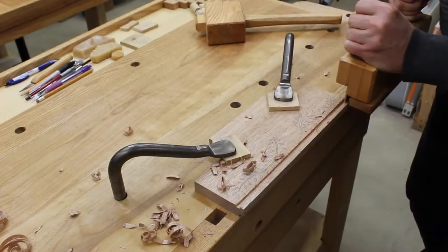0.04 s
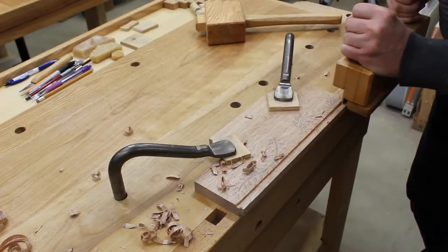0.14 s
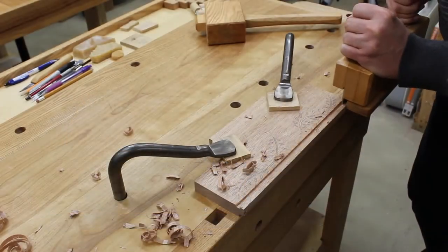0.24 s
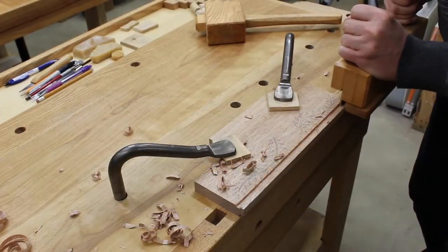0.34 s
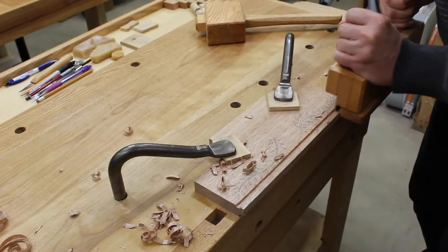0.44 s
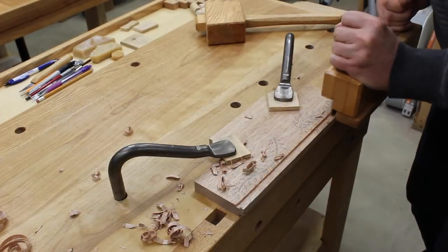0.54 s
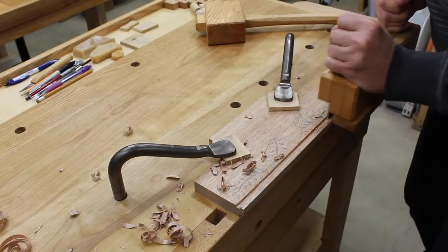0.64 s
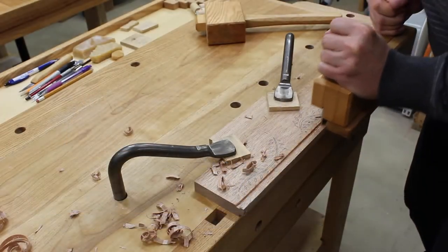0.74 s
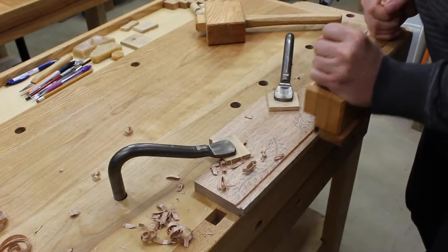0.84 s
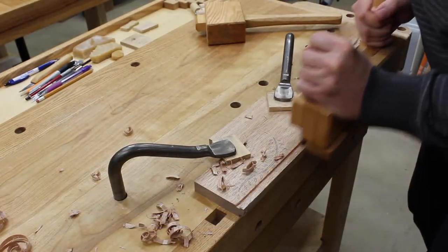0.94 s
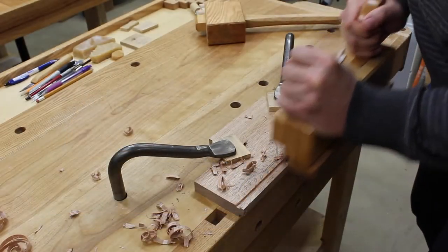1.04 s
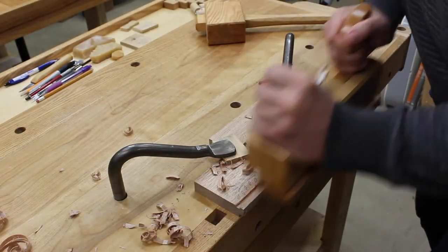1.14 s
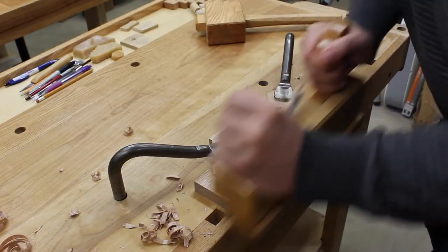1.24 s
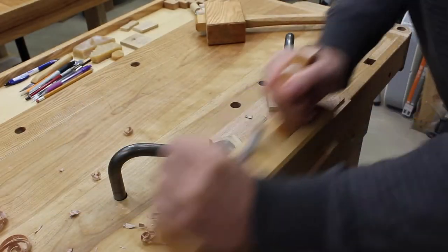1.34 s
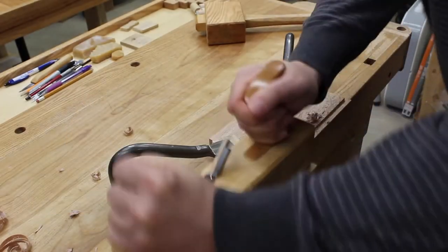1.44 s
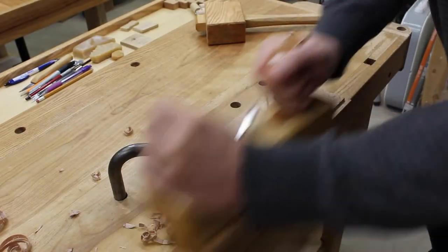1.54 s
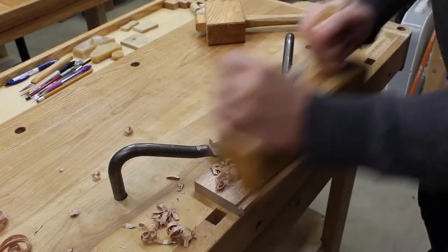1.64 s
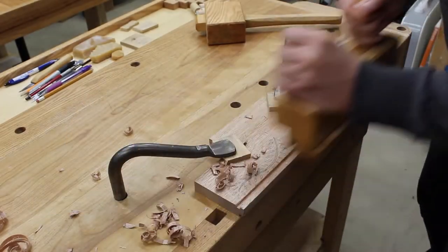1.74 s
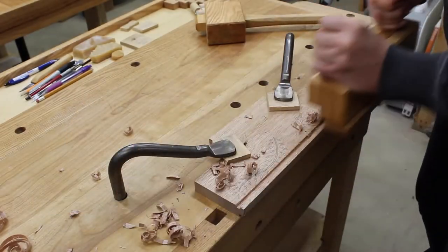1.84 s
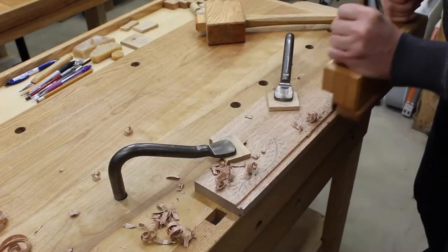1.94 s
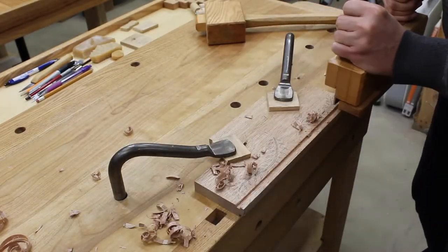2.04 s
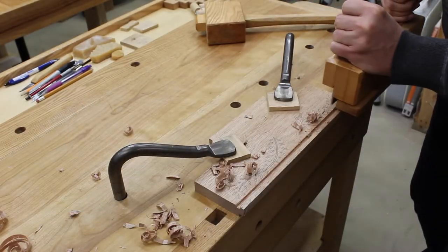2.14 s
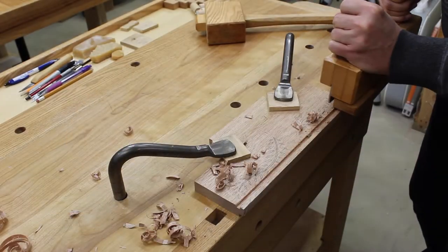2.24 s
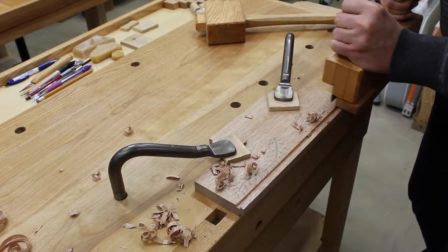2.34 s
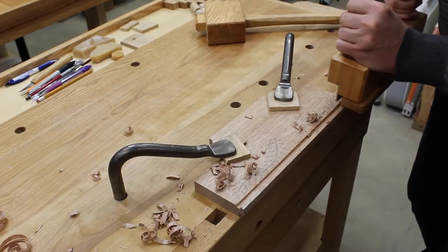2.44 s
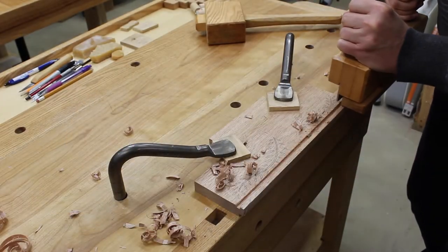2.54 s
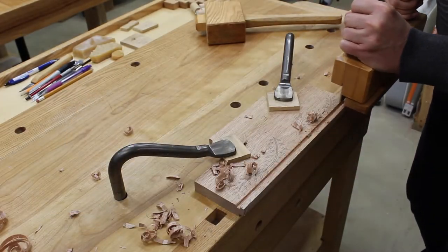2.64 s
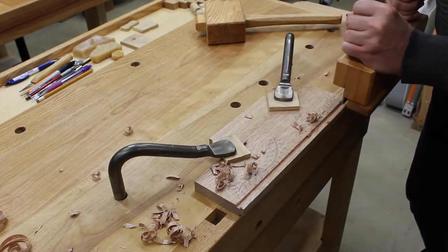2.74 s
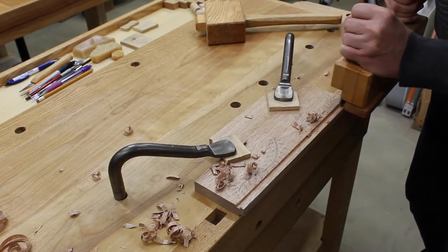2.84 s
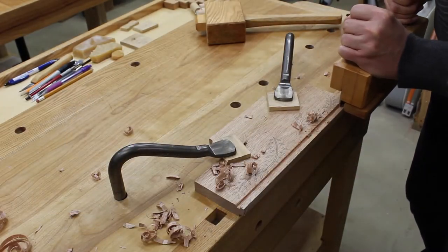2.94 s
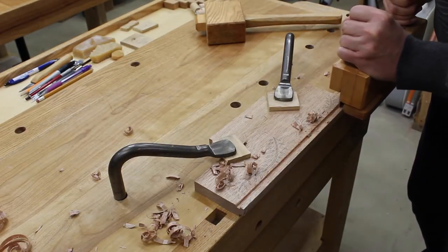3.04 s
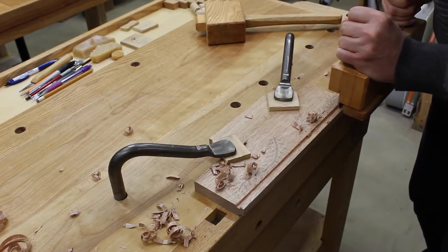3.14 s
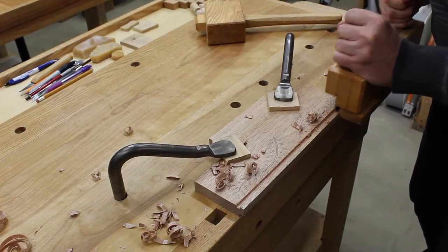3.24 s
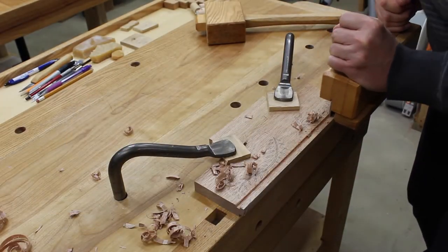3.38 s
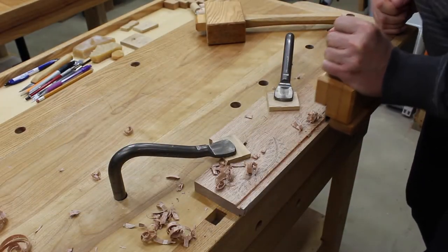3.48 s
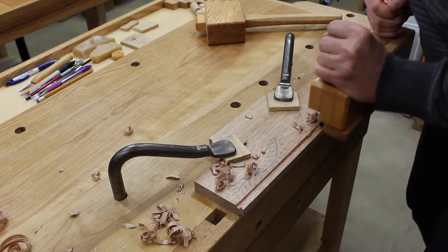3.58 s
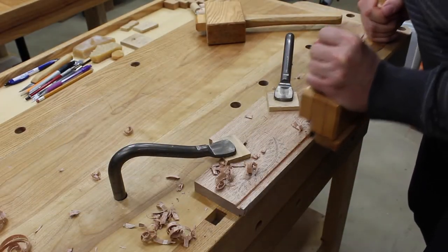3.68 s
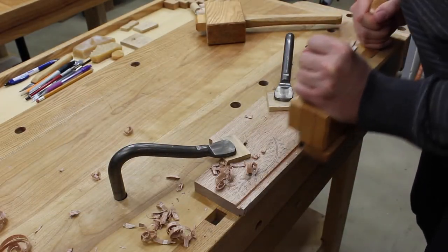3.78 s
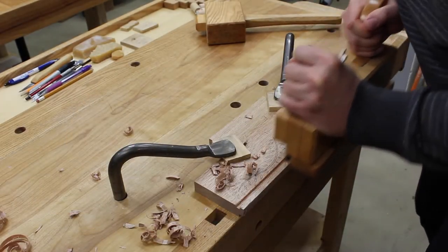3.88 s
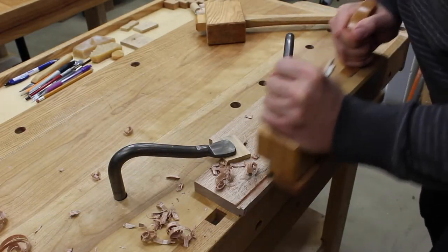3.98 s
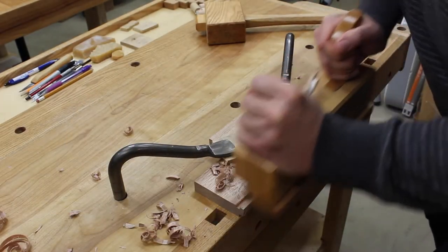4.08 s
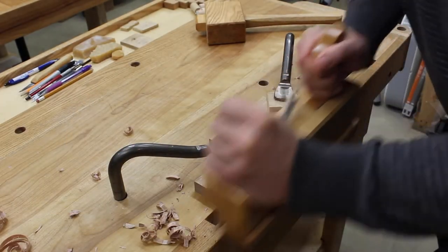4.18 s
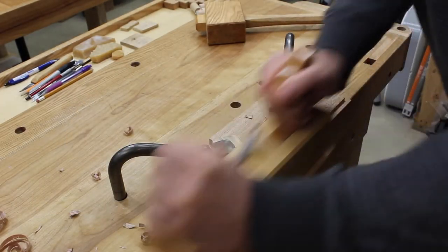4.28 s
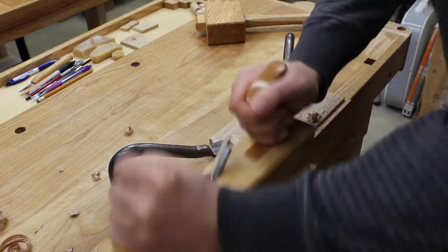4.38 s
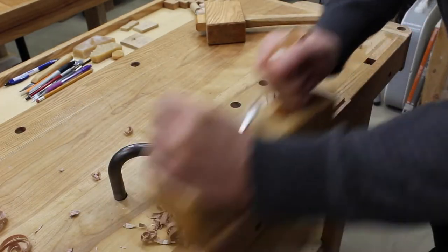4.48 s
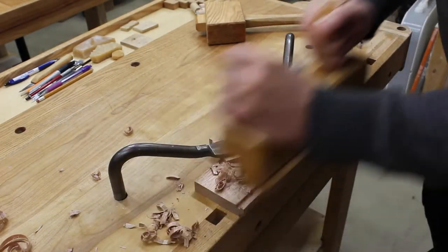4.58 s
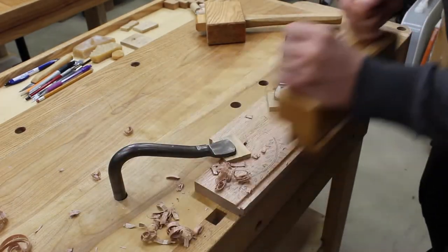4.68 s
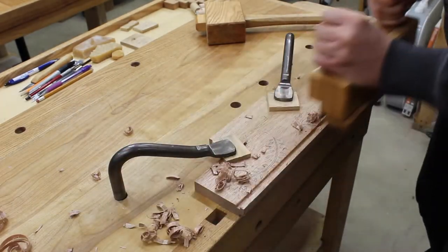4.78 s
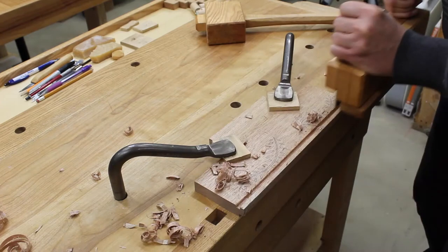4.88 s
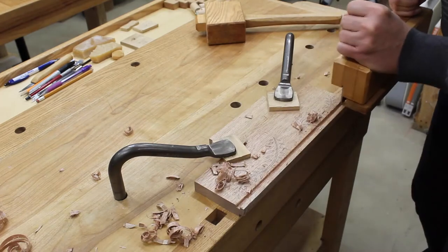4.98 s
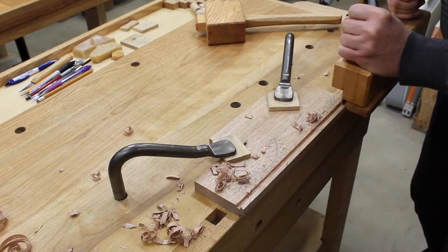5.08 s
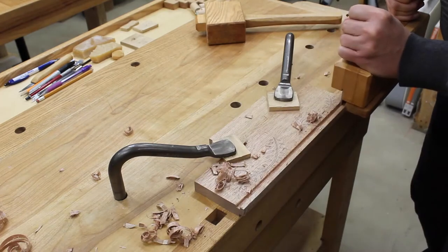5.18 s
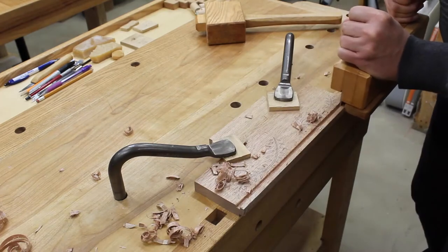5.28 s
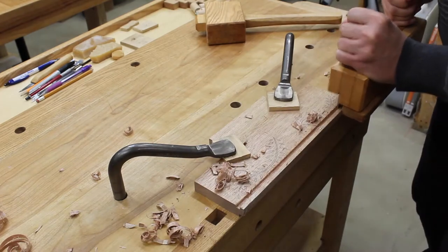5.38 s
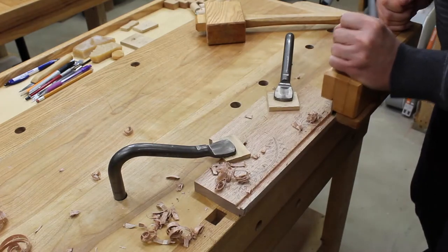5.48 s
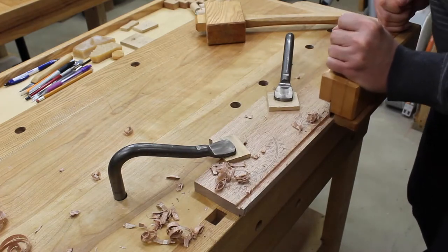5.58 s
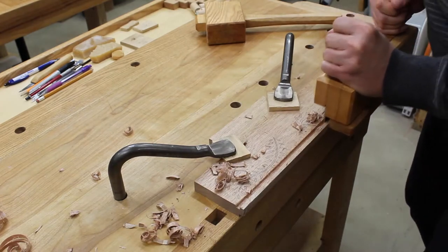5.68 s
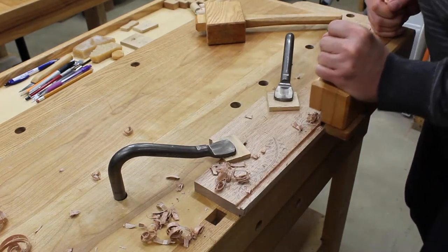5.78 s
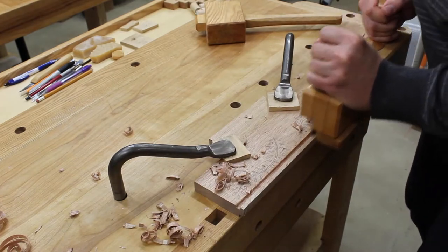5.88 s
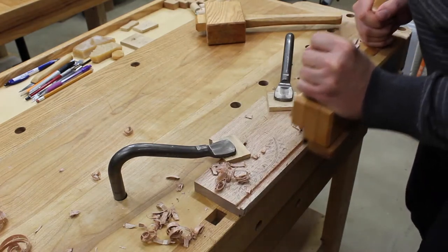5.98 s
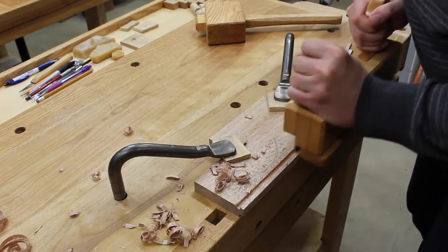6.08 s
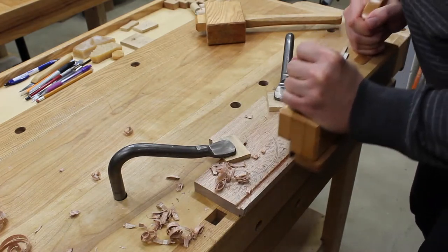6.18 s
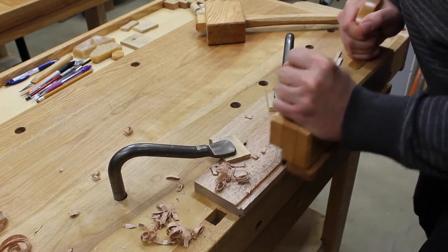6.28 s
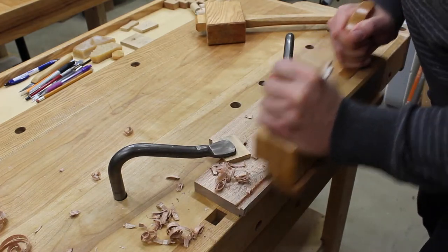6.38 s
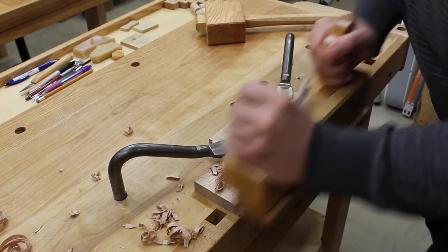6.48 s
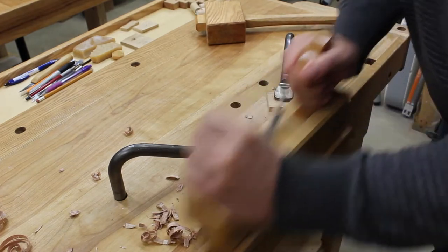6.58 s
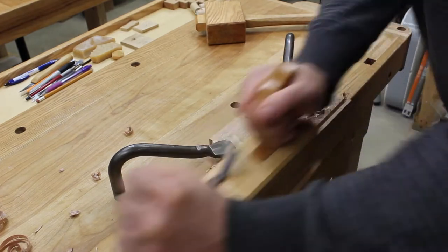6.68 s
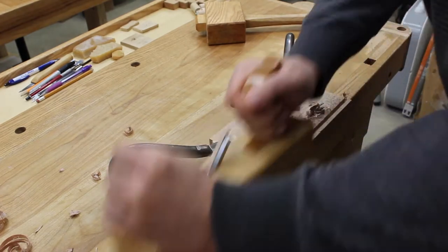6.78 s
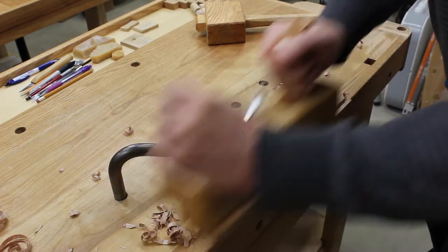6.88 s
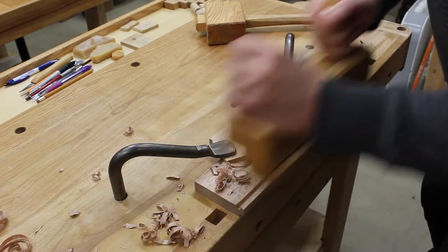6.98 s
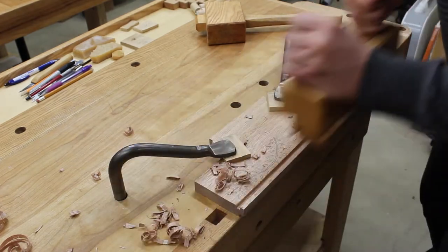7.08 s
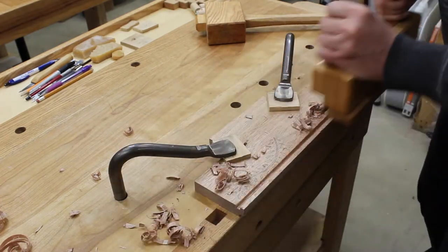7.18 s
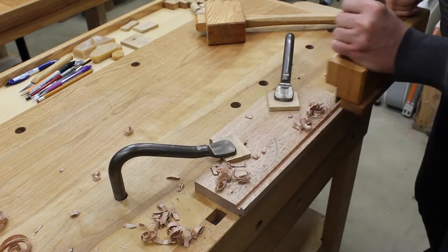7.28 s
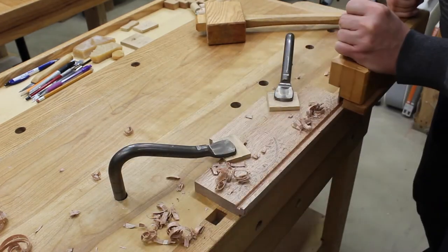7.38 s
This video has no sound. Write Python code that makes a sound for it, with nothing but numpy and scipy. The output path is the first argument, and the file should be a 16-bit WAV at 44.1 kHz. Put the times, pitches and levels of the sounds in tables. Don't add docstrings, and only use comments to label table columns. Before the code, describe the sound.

Close crunchy wood planing on a bench: three swelling strokes, hollow knocks as the tool is reseated, dry crackling shavings, short room echo.

```python
import sys
import numpy as np
from scipy import signal
from scipy.fft import rfft, irfft, next_fast_len
from scipy.io import wavfile
from scipy.ndimage import uniform_filter1d, map_coordinates

SR = 44100
rng = np.random.default_rng(int(sys.argv[2]) if len(sys.argv) > 2 else 0)


def volts_from_db(level):
    exponent = np.asarray(level, float) / 20
    return 10 ** exponent


def transcribe(u):
    v = np.clip(np.atleast_2d(u).T, -1, 1)
    q = np.round(v * 32767).astype(np.int16)
    wavfile.write(sys.argv[1], SR, q)


N = 327222

# (frequency [Hz], level [dB per Hz])
AIR_COLOUR = [(12, -52), (20, -34), (64, 0), (106, -8), (141, 0.5), (290, -13), (429, -9.5), (616, -12.5),
              (1050, -6.5), (1170, -9), (1380, -10.5), (1630, -12), (11500, -29.5), (15600, -48)]
# (frequency [Hz], level [dB rms])
HUM_LINES = [(58, -76), (11219, -86), (11816, -84)]
# (frequency [Hz], time to fall 60 dB [s])
SHOP_T60 = [(150, 0.17), (600, 0.23), (1200, 0.32), (4000, 0.32), (12000, 0.06)]

# (time [s], peak level [dB], frequency [Hz], rise [s], time to fall 60 dB [s])
BODY_BUMPS = [(3.5, -32, 94, 0.0066, 0.15), (2.2, -56, 72, 0.006, 0.14), (0.66, -41, 145, 0.006, 0.12),
              (1.335, -18, 562, 0.0085, 0.1), (3.71, -23, 562, 0.0097, 0.078),
              (6.138, -21, 296, 0.0032, 0.038), (1.3, -33, 254, 0.006, 0.079),
              (0.00048, -31.5, 310, 0.0067, 0.061), (0.47, -52, 291, 0.011, 0.097),
              (1.513, -50, 790, 0.011, 0.15), (2.015, -31, 301, 0.0083, 0.039),
              (2.6, -55, 460, 0.011, 0.091), (4.452, -53, 294, 0.011, 0.11),
              (5.087, -28.5, 292, 0.013, 0.076), (6.758, -17.5, 295, 0.0051, 0.052),
              (6.795, -34, 760, 0.0088, 0.053)]

# (time [s], effort [dB], downward pressure [dB])
PUSH_PATHS = [
    [(0.6, -47, -6), (0.64, -45.5, -8), (0.72, -38, 0.5), (0.892, -36, 1.5), (1.02, -30.5, 2.5),
     (1.206, -28, -3), (1.33, -26, -1), (1.406, -45.5, -5), (1.495, -48.5, -8)],
    [(3.42, -51, -21), (3.454, -47, -3), (3.488, -36, 0.5), (3.626, -40, 1), (3.68, -34.5, 0.8),
     (4.126, -30.5, 1.5), (4.242, -27, -2.5), (4.318, -44, -1.5), (4.45, -46, -18)],
    [(5.602, -49, -22), (5.672, -38.5, 0), (5.818, -42, 4), (5.912, -33, 1), (5.96, -38, 5),
     (6.022, -32, 0.2), (6.164, -43, 3), (6.196, -42, 0), (6.3, -34.5, 6)],
    [(6.345, -37.5, 0), (6.438, -28, -0.7), (6.616, -25, 0.5), (6.644, -39.5, 13.5), (6.73, -45, -20),
     (6.85, -57, 2)],
]
# (loudest time [s], rise [s], fall [s], level [dB],
# weight [dB])
SLIDE_MOVES = [(0.002, 0.02, 0.086, -64, 25), (0.118, 0.049, 0.12, -45, -12), (0.4, 0.066, 0.28, -56, -16),
               (0.541, 0.25, 0.16, -46, -10.5), (1.55, 0.18, 0.14, -50.5, -8), (1.68, 0.13, 0.2, -55.5, -4),
               (2.07, 0.09, 0.13, -47.5, -7.5), (2.18, 0.052, 0.11, -49.5, -9),
               (2.27, 0.1, 0.089, -47, -13.5), (2.43, 0.086, 0.11, -45, -7), (2.97, 0.1, 0.075, -49.5, 2),
               (3.1, 0.038, 0.025, -41.5, 0.5), (3.31, 0.13, 0.05, -49.5, -12),
               (3.36, 0.067, 0.044, -39, -14), (4.75, 0.24, 0.14, -64, -7), (5.015, 0.027, 0.12, -48, -1),
               (5.09, 0.038, 0.077, -45.5, -3), (5.264, 0.09, 0.044, -50.5, -2),
               (5.49, 0.18, 0.091, -47, -11), (5.56, 0.11, 0.023, -37.5, -6), (6.8, 0.05, 0.03, -48, 10),
               (7.0, 0.22, 0.077, -57, -4)]
# (offset [dB], growth with effort [dB/dB], share of pressure [dB/dB])
PUSH_MIX = [
    (-0.93, 1.31, 0.95),
    (-2, 1.02, 0.18),
    (-0.02, 1.01, 0.0097),
    (-6.5, 0.7, 0.011),
]
# (offset [dB], share of weight [dB/dB])
SLIDE_MIX = [
    (-14, 1.32),
    (-1.5, 0.74),
    (-0.94, -0.14),
    (-18, -0.87),
]
REST_LEVELS = [-59, -66.5, -61, -72]
# (time [s], surge, negative when easing [dB],
# dies in [s])
GRAIN_CATCHES = [(.7, 1, .04), (.804, 0.5, 0.045), (.868, 1, 0.034), (.95, 0, 0.024), (.975, 1, 0.037),
                 (1.0, 1.5, .04), (1.15, 2.5, .03), (1.25, 2, 0.025), (1.285, 1.5, .03), (3.51, 2.5, .03),
                 (3.721, 3, .03), (3.82, 1.5, .03), (3.929, 1, 0.032), (4.05, 2.5, .03), (4.2, 1, .03),
                 (5.644, -0.5, 0.015), (5.666, 2.5, 0.041), (5.793, -0.5, .03), (5.841, 3.5, 0.017),
                 (5.867, 3, 0.015), (5.895, 2.5, 0.03), (5.97, 1.5, 0.018), (6.021, 1.5, 0.028),
                 (6.068, 4, 0.026), (6.198, 8, 0.013), (6.25, 1.5, 0.017), (6.267, -4, .02),
                 (6.345, 1.5, 0.02), (6.39, 1, 0.025), (6.448, 2, 0.044), (6.53, 1, .03),
                 (6.606, 2.5, 0.014)]
# (frequency [Hz], level [dB per Hz])
CUT_COLOUR = [(29, -62.5), (95, -31), (140, -5), (217, -5.5), (296, 0.5), (350, -5), (609, -9.5),
              (894, -12), (984, -11.5), (1110, -22), (2450, -10), (10100, -19), (15600, -38.5)]
# (frequency [Hz], width [Hz], level [dB])
CUT_MODES = [(305.5, 11, 10), (713, 20, 4.5), (908.6, 35, 7), (1127, 66, 3), (1350, 130, -4.5),
             (1540, 18, -4), (2440, 200, -14), (3370, 42, -15), (3410, 53, -8.5), (3760, 64, -9.5),
             (4900, 40, -21), (5800, 160, -16), (6300, 110, -24), (560.7, 11.4, 2)]
# (frequency [Hz], level [dB per Hz])
LIGHT_COLOUR = [(29, -57), (50, -6), (289, -2), (405, -10), (566, -3), (1280, -12.5), (2570, -14),
                (5830, -22), (10400, -19), (15600, -44)]
# (frequency [Hz], width [Hz], level [dB])
LIGHT_MODES = [(299, 26, 9), (945.5, 9.1, 7.5), (1990, 27, -19), (2610, 160, -8), (3470, 95, -8),
               (4040, 130, -8), (4550, 1600, -13.5), (5180, 98, -9), (5720, 480, -12.5), (6830, 54, -9),
               (560, 8, -10), (8600, 30, -31.5)]
# (frequency [Hz], level [dB per Hz])
SLIDE_COLOUR = [(59, -41), (100, -4), (670, 3.5), (777, 3), (980, -3.5), (2140, -9), (11500, -23.5),
                (13000, -44)]
# (frequency [Hz], width [Hz], level [dB])
SLIDE_MODES = [(796, 95, 2), (1240, 120, 8), (2070, 26, -1.5), (2760, 60, -5.5), (3250, 200, -8),
               (3860, 300, -11.5), (4840, 250, -9), (5430, 64, -28), (6800, 77, -26)]

# (time [s], level [dB], [(frequency [Hz], width [Hz], level [dB])])
KNOCK_SPOTS = [(0.125, -21, [(689, 110, 6), (934, 33, 2), (1244, 48, -4), (1530, 45, -9), (1980, 24, -8),
               (2370, 87, -13), (2750, 71, -12), (4110, 42, -20), (5400, 36, -15)]),
               (0.535, -49, [(275, 29, -9), (1200, 33, -10), (2530, 25, -8), (3390, 31, -6), (3880, 36, -8),
               (5130, 23, -13), (5790, 68, -12)]), (2.872, -22, [(668, 190, -2), (950, 18, -9),
               (1205, 24, 3), (1540, 28, -14), (2100, 32, -7), (2750, 35, -7), (2840, 31, -8),
               (3530, 41, -4), (4630, 29, -22), (5520, 100, -21)]), (3.325, -24, [(953, 29, -2),
               (1250, 35, -15), (1590, 48, -23), (1990, 18, -2), (2550, 59, -8), (3870, 28, -9),
               (5200, 91, -10), (5630, 31, -21)]), (5.503, -25, [(711, 39, -1), (910, 21, 10),
               (2080, 26, -2), (2540, 25, -4), (3240, 32, -24), (3870, 34, -10), (4470, 28, -12),
               (5110, 100, -11), (5600, 29, 3)]), (6.755, -28, [(899, 25, -7), (1323, 18, 0), (1520, 40, 8),
               (2230, 26, -6), (2520, 28, -12), (2970, 100, -16)]), (7.4033, -27, [(307, 120, -5),
               (646, 170, 3), (1260, 130, -3), (1800, 94, -15), (2520, 120, -18), (3210, 140, -18)])]
# (time [s], peak level [dB], thud [dB], crack [dB], decay stretch [ratio])
SEATINGS = [(0.126, -7.5, -23, -4, 1.24), (0.535, -21, -15.5, 11, 1.3), (1.515, -31.5, -8.5, 14.5, 1.07),
            (2.011, -28, -12, -3, 0.76), (2.872, -10.5, -24.5, -2, 1.05), (3.086, -26.5, -30, 3, 1.4),
            (3.107, -34.5, -4, -11, 0.52), (3.326, -15, -20, 5.5, 1.5), (4.45, -36.5, -5.5, 15, 0.84),
            (5, -45, -4, -3, 1.9), (5.098, -29.5, -23, 6, 0.66), (5.502, -12.5, -23, 10.5, 1.26),
            (6.135, -38, -2, -5, 0.74), (6.293, -27, -8, -15, 0.93), (6.755, -13.5, -14.5, -15, 0.91),
            (7.4024, -9, -22.5, -16, 0.76)]
# (frequency [Hz], level [dB], time to fall 60 dB [s])
WOOD_MODES = [(292, 3.5, 0.29), (397, -8.5, 0.56), (578.4, -10, 0.5), (730, 3.5, 0.12), (917, 2, 0.18),
              (1282, 1, 0.11), (1590, -2, 0.094), (1810, -3, 0.1), (2012, -7, 0.21), (2400, -43.5, 0.061),
              (2450, 1, 0.047), (2764, -35, 0.093), (3330, -66, .1), (3800, -2, 0.041), (5730, -0.5, 0.033)]
# (frequency [Hz], level [dB per Hz])
RATTLE_COLOUR = [(59, -51), (100, -12), (276, -9), (863, -7.5), (1210, -8), (1700, -18.5), (2760, -12.5),
                 (10000, -30.5), (15600, -52)]
# (frequency [Hz], time to fall 60 dB [s])
RATTLE_DECAY = [(150, 0.29), (700, 0.24), (1500, 0.19), (4000, 0.066), (12000, 0.16)]

# (time [s], peak level [dB], centre
# [Hz], width as share of centre [ratio])
SNAPS_AND_TICKS = [(0.8852, -20, 9090, 0.61), (1.326, -15, 6420, 1.5), (3.425, -32, 5780, 0.7),
                   (3.4825, -45, 6480, 0.7), (3.9265, -16.5, 5550, 0.51), (3.9633, -13.5, 5700, 0.88),
                   (4.249, -33, 6400, 0.61), (4.4374, -37, 5660, 0.49), (5.6445, -24.5, 3200, 0.88),
                   (5.665, -26, 9500, 0.7), (5.803, -26, 9460, 0.54), (5.868, -21.5, 6050, 0.44),
                   (5.901, -17, 4500, 0.83), (6.0034, -11, 9500, 1), (6.0256, -12, 4470, 1.4),
                   (6.071, -22, 5700, 0.7), (6.2002, -18, 7050, 2.4), (6.3404, -25, 9500, .6),
                   (6.397, -22, 5660, 1.6), (6.528, -22, 10000, 1.1), (6.5744, -30.5, 5800, 0.7),
                   (6.6107, -9.5, 5760, 0.84),
                   (1.6134, -49, 3240, 0.3), (2.618, -47, 5000, 0.3), (2.6214, -47, 2950, 0.11),
              (4.6793, -36, 3100, 1.2), (3.739, -19, 2200, 0.5), (5.002, -40, 3000, 1.1),
              (6.811, -44, 10500, 0.44), (6.085, -24, 11000, 0.4), (6.172, -32, 9000, 0.7),
              (6.209, -30, 4400, .6), (6.139, -26, 3400, 1.1), (5.895, -23, 9000, .8),
              (6.216, -35, 5500, .5), (2.872, -20, 4000, 0.71), (5.5035, -27, 5800, 1),
              (4.452, -34, 7000, 1), (0.1285, -18.5, 2000, 1.2)]
# (time [s], peak
# level [dB])
SHAVING_CRACKLES = [(0.8292, -33), (0.8846, -22), (0.9484, -27), (0.9953, -26), (1.0672, -17),
                    (1.1455, -26), (1.149, -27), (1.3047, -26), (1.3256, -20), (1.5022, -40), (1.5152, -38),
                    (2.8716, -36), (3.3255, -29), (3.4827, -34), (3.5096, -26), (3.5605, -40),
                    (3.6528, -29), (3.7291, -27), (3.7845, -30), (3.8199, -31), (3.8658, -33),
                    (3.8858, -25), (3.9092, -22), (3.9342, -26), (3.9636, -28), (3.9636, -18),
                    (4.0035, -20), (4.0225, -27), (4.0514, -24), (4.0723, -20.5), (4.0983, -27),
                    (4.1232, -22), (4.1507, -20), (4.227, -23), (4.4335, -41), (5.5011, -34), (5.5011, -27),
                    (5.6632, -26), (5.8024, -27), (5.8413, -34), (5.8678, -31), (5.8997, -27), (5.99, -31),
                    (6.003, -24), (6.0239, -23), (6.1995, -26), (6.2514, -31), (6.3197, -29), (6.3392, -28),
                    (6.3981, -19), (6.409, -18), (6.4265, -22), (6.4734, -20), (6.4909, -15), (6.5248, -13),
                    (6.6096, -16)]

# (start [s], end [s], rocking over bench layer [dB], its drift [dB/s],
# iron singing over tearing layer [dB])
WHOLE_STROKES = [
    (0.584, 1.334, -18, -21, -2),
    (3.5, 4.275, -13.5, 10, -0.5),
    (5.62, 6.626, -15, 6, -10),
]
# (at stroke start [Hz], at stroke end [Hz])
ROCKING_HZ = (68.6, 134.5)
# (start [s], end [s], start pitch [Hz], end pitch [Hz], level [dB])
SOLE_SQUEAKS = [(2.1, 2.07, 1800, 1800, -60), (2.17, 2.28, 2000, 2090, -52), (2.16, 2.22, 1600, 1750, -59),
                (2.4, 2.49, 1780, 1780, -61), (.6, 0.62, 2650, 2200, -56)]

# (frequency [Hz], level [dB])
MIC_LOSS = [(40, -18), (110, -5), (9000, -6.5), (12000, -9), (14500, -19), (16000, -30)]
# (frequency [Hz], level [dB])
TREBLE_FALL = [(20, -1.5), (14000, -2), (15050, -5), (15150, -22), (15750, -26)]
# (frequency [Hz], level [dB per Hz])
HISS_COLOUR = [(6000, -30), (11000, -29), (14000, 13), (15500, 4), (15570, -70)]

FULL_EFFORT_DB = -35


def unit(x):
    return x / np.sqrt(np.mean(x ** 2) + 1e-20)


def along(points, hz):
    f, v = np.transpose(points)
    return np.interp(np.log(hz + 1), np.log(f + 1), v)


def wobble(rate):
    knots = rng.standard_normal(int(N * 600 / SR))
    return map_coordinates(knots, [np.arange(N) * rate / SR])


def filtered(x, response):
    m = next_fast_len(len(x) + SR // 2)
    return irfft(rfft(x, m) * response(np.fft.rfftfreq(m, 1 / SR)), m)[:len(x)]


def dying(t60s):
    hz, t, z = signal.stft(rng.standard_normal(SR // 2), SR, nperseg=128)
    fade = volts_from_db(-60 * t / t60s(hz)[:, None])
    tail = signal.istft(z * fade, SR, nperseg=128)[1][:SR // 2]
    return tail / np.linalg.norm(tail)


def resonance(hz, centre_hz, width_hz):
    return 1j * hz * width_hz / (centre_hz ** 2 - hz * hz + 1j * hz * width_hz)


def moving_mode(s, hz, db, width_hz):
    t = np.arange(N) / SR
    turn = 2 * np.pi * np.cumsum(np.interp(t, s, hz)) / SR
    shake = wobble(width_hz) * np.cos(turn) + wobble(width_hz) * np.sin(turn)
    times, levels = [s[0] - 0.06, *s, s[-1] + 0.037], [-80, *db, -80]
    return shake * volts_from_db(np.interp(t, times, levels, -150, -150))


def room_tone():
    t = np.arange(N) / SR
    air = unit(filtered(rng.standard_normal(N), lambda hz: volts_from_db(along(AIR_COLOUR, hz))))
    lines = 0
    for hz, db in HUM_LINES:
        tone = np.sin(2 * np.pi * hz * t + 1.3 * wobble(9.4))
        lines = lines + np.sqrt(2) * volts_from_db(db + 1.9 * wobble(11)) * tone
    return volts_from_db(-53.5 + 0.62 * wobble(4.02)) * air + lines


def bumps():
    out, t = np.zeros(N + SR), np.arange(SR // 2) / SR
    for s, db, hz, rise, t60 in BODY_BUMPS:
        swell = (1 - np.exp(-t / rise)) ** 2 * volts_from_db(-60 * t / t60)
        out[round(s * SR):][:len(t)] += volts_from_db(db) * swell / swell.max() * np.sin(2 * np.pi * hz * t)
    return out[:N]


def motion():
    t = np.arange(N) / SR
    power = volts_from_db(2 * np.array(REST_LEVELS))[:, None] * np.ones(N)
    offset, growth, share = np.transpose(PUSH_MIX)[..., None]
    for s, effort, pressure in map(np.transpose, PUSH_PATHS):
        outside = np.maximum(np.maximum(s[0] - t, t - s[-1]), 0)
        fade = 247 * outside
        extra = np.interp(t, s, effort) - FULL_EFFORT_DB
        db = FULL_EFFORT_DB + offset + growth * extra + share * np.interp(t, s, pressure)
        power = np.maximum(power, volts_from_db(2 * (db - fade)))
    offset, share = np.transpose(SLIDE_MIX)[..., None]
    for s, rise, fall, db, weight in SLIDE_MOVES:
        away = np.abs(t - s) / np.where(t < s, rise, fall)
        shape = volts_from_db(-40 * away ** 1.87)
        power = power + volts_from_db(2 * (db + offset + share * weight)) * shape
    return 10 * np.log10(power)


def fibres(per_s, spread_db, rub):
    happens = rng.random(N) < per_s / SR
    size = np.minimum(rng.exponential(size=N), 5.5)
    sign = np.sign(rng.standard_normal(N))
    return unit(happens * sign * volts_from_db(spread_db * size)) + rub * rng.standard_normal(N)


def patchy(x, depth_db):
    hz, _, z = signal.stft(x, SR, nperseg=512)
    field = uniform_filter1d(rng.standard_normal(z.shape), size=4, axis=0)
    field = uniform_filter1d(field, size=9, axis=1)
    depth = depth_db * np.clip(hz / 1000, 0, 1)[:, None]
    return signal.istft(z * volts_from_db(depth * unit(field)), SR, nperseg=512)[1][:N]


def catches():
    t = np.arange(N) / SR
    surge = sum(db * (t >= s) * np.exp(-np.maximum(t - s, 0) / dies) for s, db, dies in GRAIN_CATCHES)
    return volts_from_db(surge)


def resonant(hz, colour, modes, lift_db):
    rings = sum(volts_from_db(db - along(colour, c) + lift_db) * resonance(hz, c, w) for c, w, db in modes)
    return volts_from_db(along(colour, hz)) * (1 + rings)


def band(hz, lo_hz, hi_hz):
    return np.sqrt(1 / (1 + (lo_hz / (hz + 1)) ** 8) / (1 + (hz / hi_hz) ** 8))


def plane(levels):
    force = fibres(per_s=5000, spread_db=2.5, rub=1.04) * volts_from_db(0.49 * wobble(14) + 0.49 * wobble(70))
    force = force + 0.2 * fibres(per_s=400, spread_db=2.0, rub=0)
    force = patchy(force * volts_from_db(1.3 * wobble(220)), depth_db=1.6)
    force = force * catches()
    heavy = filtered(force, lambda hz: resonant(hz, CUT_COLOUR, CUT_MODES, lift_db=-4.5))
    light = filtered(force, lambda hz: resonant(hz, LIGHT_COLOUR, LIGHT_MODES, lift_db=-4.5))
    slide = filtered(force, lambda hz: resonant(hz, SLIDE_COLOUR, SLIDE_MODES, lift_db=-11.0))
    press = np.clip((levels[0] + 40.5) / 9, 0, 1)
    idle = np.clip((-44.0 - levels[2]) / 3, 0, 1)
    out = 0
    bands_hz = [(125, 450), (450, 1800), (1800, 7000), (7000, 20000)]
    for (lo, hi), db in zip(bands_hz, levels):
        a, b, c = (unit(filtered(x, lambda hz: band(hz, lo, hi))) for x in (heavy, light, slide))
        cutting = press * a + (1 - press) * b
        out = out + (idle * c + (1 - idle) * cutting) * volts_from_db(db)
    return out


def favoured():
    out, t = np.zeros(N + SR), np.arange(SR // 4) / SR
    for s, db, modes in KNOCK_SPOTS:
        for hz, width_hz, level in modes:
            swell = np.exp(-1.1 * np.pi * width_hz * t) * (1 - np.exp(-t * hz / 1.2))
            out[round(s * SR):][:len(t)] += volts_from_db(db + level) * swell * np.sin(2 * np.pi * hz * t)
    return out[:N]


def knocks():
    out, t = np.zeros(N + SR), np.arange(SR // 2) / SR
    for s, db, thud_db, crack_db, stretch in SEATINGS:
        balance = [(300, thud_db + 19.5), (500, 0), (2200, 0), (3500, crack_db + 2.5)]  # (Hz, dB)
        tilt = lambda hz: volts_from_db(along(balance, hz))
        ring = 0
        for hz, level, t60 in WOOD_MODES:
            louder, sharper, phase = rng.standard_normal(3)
            decay = volts_from_db(level + 0.72 * louder - 60 * t / (0.52 * t60 * stretch))
            tone = np.sin(2 * np.pi * (hz * (1 + 0.0081 * sharper) * t + phase))
            ring = ring + tilt(hz) * decay * (1 - np.exp(-t * hz)) * tone
        click_hz = 2400 * (1 + 0.1 * rng.standard_normal())
        click = 3.2 * volts_from_db(0.4 * crack_db + min(crack_db + 8, 0) - 60 * t / 0.007)
        click = click * np.sin(2 * np.pi * click_hz * t)
        crack = 4 * volts_from_db(0.74 * crack_db - 60 * t / 0.0036) * rng.standard_normal(len(t))
        crack = filtered(crack, lambda hz: 1 / (1 + 1j * hz / 5500) ** 2)
        rattle = dying(lambda hz: stretch * along(RATTLE_DECAY, hz))
        rattle = filtered(rattle, lambda hz: tilt(hz) * volts_from_db(along(RATTLE_COLOUR, hz)))
        rattle = volts_from_db(45.5) * rattle * (1 - np.exp(-t / 0.00046))
        blow = volts_from_db(-4.5) * ring + 0.93 * click + crack + rattle
        out[round(s * SR):][:len(t)] += volts_from_db(db - 8.0) * blow
    return out[:N]


def snaps():
    out, t = np.zeros(N + SR), np.arange(SR // 20) / SR
    crackles = [(s, db - 0.5, 10300, 0.43) for s, db in SHAVING_CRACKLES]
    for s, db, centre_hz, width in SNAPS_AND_TICKS + crackles:
        burst = (t == 0) + 0.45 * volts_from_db(-60 * t / 0.004) * rng.standard_normal(len(t))
        burst = filtered(burst, lambda hz: resonance(hz, centre_hz, width * centre_hz) ** 1.6)
        out[round(s * SR):][:len(t)] += volts_from_db(db + 10.5) * burst / np.abs(burst).max()
    return out[:N]


def sway(levels):
    out = 0
    for start, end, rock_db, drift, sing_db in WHOLE_STROKES:
        s = np.linspace(start, end, num=60)
        here = np.int_(s * SR)
        bench_db = levels[0][here] + rock_db + drift * (s - (start + end) / 2)
        out = out + moving_mode(s, np.interp(s, [start, end], ROCKING_HZ), bench_db, width_hz=43)
        extra = levels[2][here] - FULL_EFFORT_DB
        iron_hz = 2530 - 13 * extra
        iron_db = FULL_EFFORT_DB + 0.35 * extra + sing_db - 7.0
        out = out + moving_mode(s, iron_hz, iron_db, width_hz=95)
    return out


def squeaks():
    return sum(moving_mode([a, b], [lo, hi], [db, db], width_hz=130) for a, b, lo, hi, db in SOLE_SQUEAKS)


def shop(x):
    tail = rfft(dying(lambda hz: along(SHOP_T60, hz)))
    power = np.abs(tail) ** 2
    even = tail * np.sqrt(uniform_filter1d(power, size=300) / uniform_filter1d(power, size=16))
    return signal.fftconvolve(np.pad(x, (300, 0)), irfft(even)[:SR // 3])[:N]


def scene():
    levels = motion()
    cut = plane(levels) + sway(levels) + squeaks()
    hits = knocks() + snaps() + bumps() + favoured()
    hits = filtered(hits, lambda hz: volts_from_db(along(MIC_LOSS, hz)))
    echo = shop(volts_from_db(-9.5) * cut + volts_from_db(-11.5) * hits)
    return (cut + hits + echo + room_tone())[None]


def roll_off(x):
    return signal.sosfilt(signal.butter(12, 15760, fs=SR, output="sos"), x)


def record(dry):
    hiss = unit(filtered(rng.standard_normal(N), lambda hz: volts_from_db(along(HISS_COLOUR, hz))))
    heard = filtered(dry[0], lambda hz: volts_from_db(along(TREBLE_FALL, hz)))
    mix = heard + volts_from_db(-84) * hiss
    return roll_off(mix[None])


dry = scene()
out = record(dry)
transcribe(out)
```